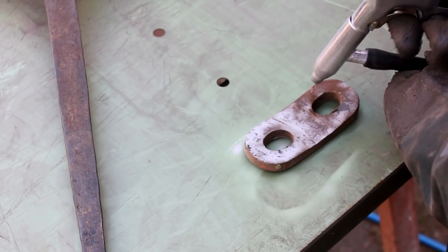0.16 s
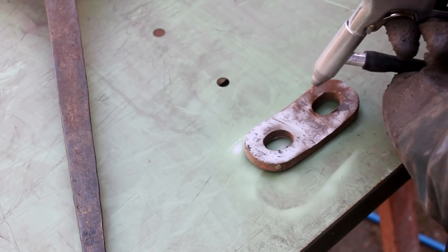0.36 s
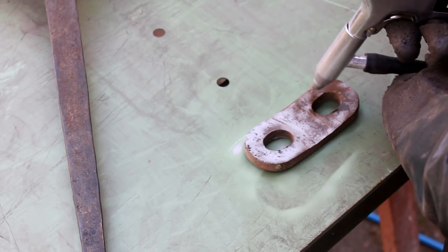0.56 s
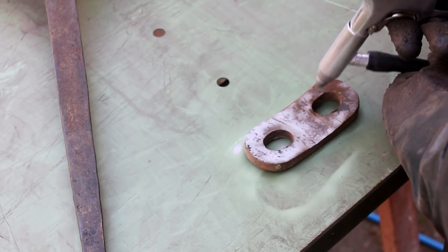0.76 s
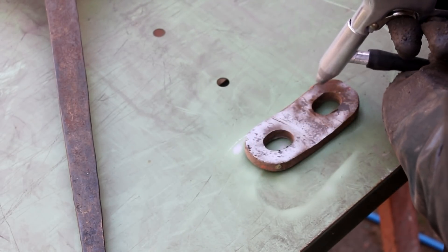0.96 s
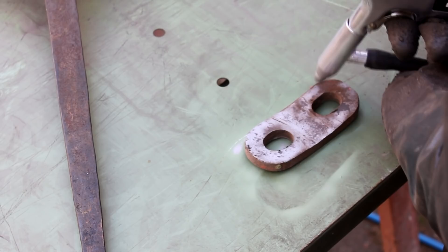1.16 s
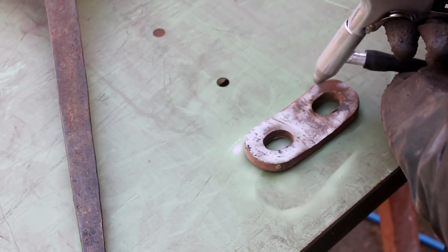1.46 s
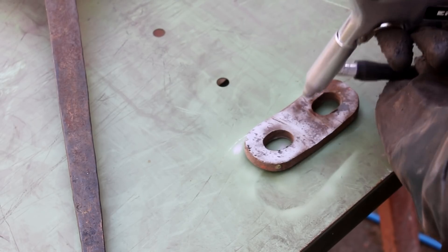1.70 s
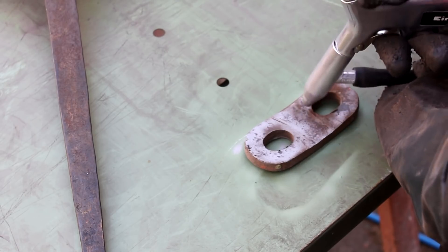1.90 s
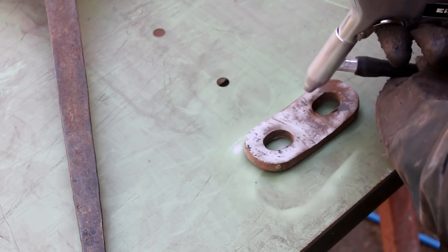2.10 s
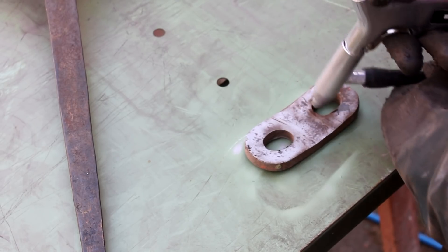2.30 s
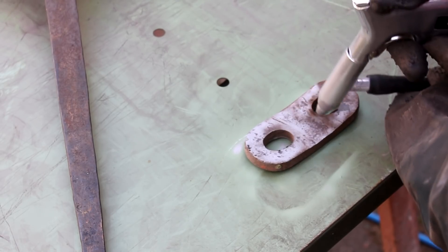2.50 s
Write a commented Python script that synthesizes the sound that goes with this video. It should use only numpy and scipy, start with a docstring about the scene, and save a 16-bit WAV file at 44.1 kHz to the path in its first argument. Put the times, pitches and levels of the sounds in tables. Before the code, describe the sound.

Sandblaster hiss: a sudden jet of gritty compressed air, then continuous rushing spray on metal

```python
"""Small sandblasting gun in a workshop

After a faint tick of the trigger, a jet of air and grit hisses on a steel part in a quiet workshop.
The hiss is noise with broad humps that swell and sink as the nozzle wanders over the part and its holes.
A lumpy roar of deflected air and thudding grains lies below. A motor hums and something whines faintly
in the room, made of dull noise and wavering tones. Nearly mono: random treble patches flicker wide."""
import sys
import numpy as np
from scipy import signal
from scipy.io import wavfile
from scipy.ndimage import uniform_filter1d

SR = 44100
rng = np.random.default_rng(int(sys.argv[2]) if len(sys.argv) > 2 else 0)


def volts(x):
    """Linear amplitude factor 10**(x/20) for a level x in dB, scalar or array-like."""
    e = np.asarray(x, float) / 20
    return 10 ** e


def int16_out(signal):
    """Quantize to a 16-bit WAV file."""
    q = np.round(np.clip(np.atleast_2d(signal).T, -1, 1) * 32767)
    wavfile.write(sys.argv[1], SR, q.astype(np.int16))


N = 116865  # length in samples
OPEN_S = 0.1022  # the moment the valve opens


def evened(x):
    """Scales a sound to rms 1."""
    return x / np.sqrt(np.mean(x ** 2) + 1e-20)


def read(points, hz):
    """Reads a spectrum between its points, on a log-frequency axis."""
    f, value = np.transpose(points)
    return np.interp(np.log(hz + 1), np.log(f + 1), value)


def curves(rows, t):
    """Joins the rows of a table by straight lines in time, one curve for each column after the first."""
    rows = np.array(rows)
    return [np.interp(t, rows[:, 0], column) for column in rows.T[1:]]


def shaped(x, gain, size=512):
    """Filters x by multiplying its short-time spectra by gain(Hz, s)."""
    overlap = size * 3 // 4
    hz, t, z = signal.stft(x, SR, nperseg=size, noverlap=overlap)
    return signal.istft(z * gain(hz[:, None], t), SR, nperseg=size, noverlap=overlap)[1][:N]


def chance(shape, bins, frames):
    """Random field of rms 1, smoothed over frequency bins and time frames."""
    smooth = uniform_filter1d(rng.standard_normal(shape), bins, 0)
    return evened(uniform_filter1d(smooth, frames, 1))


# Shape of the room noise. Each row: frequency in Hz, relative level in dB.
ROOM_SPECTRUM = [(25, -26), (52, 4), (75, -5), (130, -4), (300, -6), (500, -14), (1000, -22), (1500, -22),
                 (3000, -37), (8000, -45), (16000, -51)]


def room_noise(level_db=-70):
    """Dull noise of the room: steady random noise, strongest in the bass."""
    noise = shaped(rng.standard_normal(N), lambda hz, _: volts(read(ROOM_SPECTRUM, hz)), size=2048)
    return volts(level_db) * evened(noise)


# Tones of the motor hum and the whine. Each row: frequency in Hz, level in dB before the room sound
# sinks, width in Hz (a wider tone wavers faster).
HUM_TONES = [(94, -69.5, 17), (183, -74.5, 14), (233, -79, 10), (283, -71, 15), (410, -77, 6.1),
             (572, -90, 11), (663, -82, 8.3), (757, -78, 10), (890, -85, 7.4), (985, -81, 10),
             (5400, -95, 15)]


def hum_and_whine():
    """Each tone is a steady carrier plus slow random wavering, which widens its spectral line."""
    t = np.arange(N) / SR
    out = np.zeros(N)
    for hz, db, width in HUM_TONES:
        decay = np.exp(-np.pi * width / SR)
        noise = rng.standard_normal(N) + 1j * rng.standard_normal(N)
        waver = signal.lfilter([1], [1, -decay], noise)
        steady = 1.14 * np.std(waver)
        tone = np.exp(2j * np.pi * hz * t) * (waver + steady)
        out += volts(db) * evened(tone.real)
    return out


# The trigger's tick. The one row: time in seconds, level in dB of its noise at the peak,
# middle frequency in Hz, length in seconds (from the peak until it has fallen to 1/e).
TRIGGER_TICK = (.041, -83, 10000, .0018)


def trigger_tick():
    """A faint tick: a very short swell of band-limited noise."""
    t = np.arange(N) / SR
    peak_s, db, hz, length = TRIGGER_TICK
    band = signal.butter(2, [hz * 0.7, hz * 1.3], "band", fs=SR)
    noise = evened(signal.lfilter(*band, rng.standard_normal(N)))
    return volts(db) * np.exp(-((t - peak_s) / length) ** 2) * noise


def workshop(sink_db=-8.5, sink_s=0.17):
    """Room noise and hum, which sink gradually once the jet is on, and the tick."""
    since_open = np.maximum(np.arange(N) / SR - OPEN_S, 0)
    sink = volts(sink_db * (1 - np.exp(-since_open / sink_s)))
    return sink * (room_noise() + hum_and_whine()) + trigger_tick()


def valve(leak_db=-24, leak_s=0.003, rise_s=0.0035, surge_db=4, surge_s=0.011):
    """The valve leaks for a moment, opens fast and lets off a short surge of pressure."""
    t = np.arange(N) / SR - OPEN_S
    leak = volts(leak_db) * np.clip(1 + t / leak_s, 0, 1)  # against the height of the surge
    opening = np.clip(t / rise_s, 0, 1)
    surge = volts(surge_db * np.exp(-np.maximum(t - rise_s, 0) / surge_s))
    return np.maximum(leak, opening) * surge


# Broad humps of the hiss. Each row: centre in Hz, width in Hz.
# The centres of the 2nd, 4th and 6th hump come from the wandering table instead.
HISS_HUMPS = [(3300, 1320), (4700, 1130), (6100, 1220), (7500, 1380), (9200, 1640), (10800, 1770),
              (13200, 2300), (15100, 1100)]
# How those humps wander. Each row: time in seconds, then the centres in Hz of the 2nd, 4th and 6th hump.
HUMP_WANDER = [(0.12, 4420, 7350, 10500), (0.18, 4400, 7760, 10550), (0.46, 4730, 7510, 10650),
               (0.6, 4590, 7630, 10600), (0.84, 4930, 7670, 10500), (1.36, 4890, 7460, 10730),
               (1.66, 4880, 7860, 10900), (1.87, 4630, 7280, 10500), (2.15, 4950, 7820, 10600),
               (2.28, 4470, 7400, 10800), (2.33, 4680, 7280, 10400), (2.42, 4690, 7610, 10850),
               (2.57, 4700, 7670, 10700), (2.65, 4500, 7140, 10900)]
# How the humps swell and sink as the nozzle moves. Each row: time in seconds, then one level in dB
# for each hump from low to high, before the rings, the patches and the valve act on it.
HUMP_SWELLS = [(0.12, -44, -41.5, -42.5, -39, -36, -44, -47, -56),
               (0.15, -43.5, -41.5, -44.5, -38.5, -38.5, -37.5, -47, -54),
               (0.3, -43.5, -40, -42, -41, -38, -38, -41, -60),
               (0.32, -44.5, -41, -42, -40.5, -39.5, -36, -41, -51),
               (0.43, -42, -40, -39, -41, -42.5, -41.5, -42.5, -53),
               (0.53, -44, -41, -40.5, -40, -41.5, -40, -42, -50),
               (0.71, -43, -36.5, -42, -39.5, -43.5, -45.5, -42, -52),
               (0.8, -43, -38, -41, -39, -48, -46, -46, -50),
               (0.87, -46.5, -38.5, -38.5, -39, -44.5, -46, -49, -55),
               (1.05, -45.5, -40.5, -39.5, -39, -49, -46.5, -49, -57),
               (1.11, -46, -39, -38.5, -39.5, -47, -44.5, -50.5, -57),
               (1.32, -45.5, -39.5, -41.5, -41.5, -49, -42.5, -49, -50),
               (1.5, -47, -39.5, -37, -41.5, -48, -45, -51, -55),
               (1.54, -47.5, -37, -41, -44.5, -49, -49, -50, -59),
               (1.68, -47.5, -42.5, -45, -41, -50, -42, -45, -50),
               (1.7, -49.5, -43, -42.5, -37, -45, -42, -42, -50),
               (1.87, -48, -43, -42.5, -36, -46, -49, -44, -51),
               (1.89, -46.5, -43, -43.5, -35.5, -54, -41.5, -43, -53),
               (2.05, -48.5, -44.5, -45, -36.5, -48, -44, -47, -56),
               (2.15, -45.5, -41, -43.5, -40.5, -48, -45, -47, -49),
               (2.21, -45, -40.5, -43, -39, -44, -45.5, -44, -52),
               (2.35, -47, -37.5, -41, -41.5, -45, -42.5, -46, -47),
               (2.4, -44, -40.5, -45, -40.5, -42.5, -38, -43, -50),
               (2.51, -45.5, -46, -48.5, -41, -45, -37.5, -42, -46),
               (2.64, -45, -37.5, -46, -41, -47, -40, -48, -55),
               (2.65, -42, -43, -48, -40, -46, -43, -47, -52)]
# Damped rings and hollows of the steel part and bench, which colour the hiss throughout.
# Each row: frequency in Hz, width in Hz, change in dB (plus for a ring, minus for a hollow).
STEEL_RINGS = [(3670, 290, 1.5), (4950, 140, 3), (5600, 250, -1), (7300, 170, 0.5), (7600, 220, -0.5),
               (8600, 320, 3), (9350, 280, -2), (10600, 180, 1), (10850, 250, 0.5), (11400, 360, -0.5),
               (12460, 400, 3), (13000, 300, 1), (13650, 300, 2.5), (14300, 400, -2)]


def hiss_gain(hz, t, patchy_db=0.68, flutter_db=0.16):
    """Spectrum of the turbulent jet: bell-shaped humps, rings, drifting patches and a shared flutter."""
    centres = [f for f, _ in HISS_HUMPS]
    centres[1:6:2] = curves(HUMP_WANDER, t)
    power = 0
    for centre_hz, (_, width), db in zip(centres, HISS_HUMPS, curves(HUMP_SWELLS, t)):
        bell = np.exp(-np.pi * ((hz - centre_hz) / width) ** 2)
        power = power + volts(2 * db) / width * bell
    patches = patchy_db * chance((len(hz), len(t)), bins=5, frames=24)
    flutter = flutter_db * chance((1, len(t)), bins=1, frames=8)
    rings = sum(db / (1 + (2 * (hz - f) / width) ** 2) for f, width, db in STEEL_RINGS)
    return np.sqrt(power * SR / 2) * volts(patches + flutter + rings)


def hiss():
    """Hiss of the turbulent jet: random noise filtered by the moving humps."""
    return shaped(rng.standard_normal(N), hiss_gain)


def spreads(hz, t, per_s=12, half_s=0.024, width_hz=1800, level_db=-3.5):
    """Gain of brief treble patches at random moments and pitches, against the level of the hiss."""
    when, place = rng.random((round(per_s * N / SR), 2)).T
    peak_s = when[:, None] * N / SR
    centre_hz = 4800 + 10500 * place ** 1.5
    in_band = abs(hz - centre_hz) < width_hz / 2
    swell = np.cos(np.pi / 2 * np.clip((t - peak_s) / half_s, -1, 1))
    return volts(level_db) * np.minimum(in_band @ swell, 1)


def wide_flicker():
    """Separate noise, heard only in brief random patches of treble that flicker wide."""
    return shaped(rng.standard_normal(N), lambda hz, t: hiss_gain(hz, t) * spreads(hz, t))


# Shape of the roar. Each row: frequency in Hz, relative level in dB.
ROAR_SPECTRUM = [(25, -51), (60, -35), (120, -5), (300, -2.5), (800, -1), (1600, 2), (2400, 1.5),
                 (3500, -13), (6000, -39)]
# How the roar changes as the nozzle moves. Each row: time in seconds, level in dB,
# level of its bass in dB against that. Both are raised by fixed amounts in roar().
ROAR_SWELLS = [(0.14, -49, -7.5), (0.17, -47, -6), (0.55, -50, -6.5), (0.67, -49.5, -3.5), (0.86, -55, -7),
               (0.89, -52, -4), (0.9, -52, -10.5), (1.22, -52.5, -9), (1.22, -51, -7.5),
               (1.46, -51.5, -9.5), (1.55, -53, -15), (1.69, -51, -9), (1.71, -47.5, -8.5),
               (2.07, -50.5, -7.5), (2.08, -50, -12), (2.37, -48.5, -3), (2.48, -52, -5.5),
               (2.49, -53, -2.5), (2.65, -49.5, -10.5)]


def grit(per_s=900, spread_db=5):
    """Larger grains thudding on the part: single clicks at random moments, of random size and sign."""
    size = volts(spread_db * np.minimum(rng.exponential(1, N), 5))
    hits = rng.random(N) < per_s / SR
    return evened(size * hits * rng.choice([-1., 1.], N))


def roar(grit_db=-7, lumpy_db=0.5, lift_db=10.5, bass_db=6, puff_db=5.5, puff_s=0.0085):
    """Deflected air and thudding grains; the bass thins and fills as the nozzle moves, after a first puff."""
    drive = rng.standard_normal(N) + volts(grit_db) * grit()
    lumps = volts(lumpy_db * chance((1, N), bins=1, frames=500)[0])

    def gain(hz, t):
        db, bass = curves(ROAR_SWELLS, t)
        # no bass change above 1500 Hz, all of it at 400 Hz, up to 1.4 times as many dB below
        share = np.clip(np.log(1500 / (hz + 1)) / np.log(1500 / 400), 0, 1.4)
        return volts(read(ROAR_SPECTRUM, hz) + db + (bass + bass_db) * share)

    since_open = np.maximum(np.arange(N) / SR - OPEN_S, 0)
    puff = volts(puff_db * np.exp(-since_open / puff_s))
    return puff * volts(lift_db) * shaped(evened(drive * lumps), gain, size=1024)


def scene():
    """The same sound in both channels, but for the wide flicker, which has opposite signs."""
    middle = hiss() + roar()
    left_right = np.array([[1], [-1]])
    side = left_right * wide_flicker()
    return valve() * (middle + side) + workshop()


def band_limit(x):
    """A steep low-pass at the top of the band."""
    return signal.sosfilt(signal.butter(12, 16480, fs=SR, output="sos"), x)


def record(dry):
    """Cuts off the top of the treble steeply and returns the finished mix."""
    lowpass = signal.firwin(1023, 15760, window=("kaiser", 9), fs=SR)  # edge in Hz
    limited = signal.oaconvolve(dry, lowpass[None], "same")
    return band_limit(limited)


dry = scene()
out = record(dry)
int16_out(out)
```